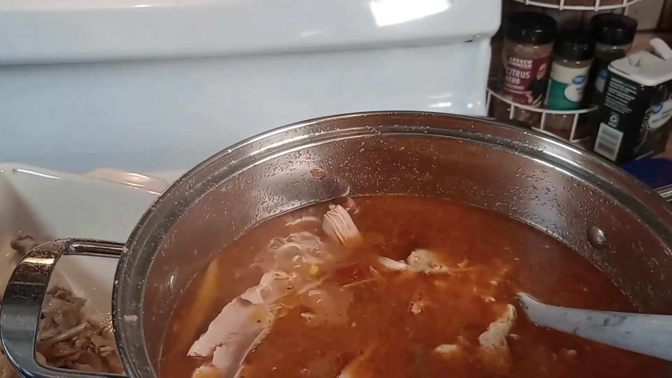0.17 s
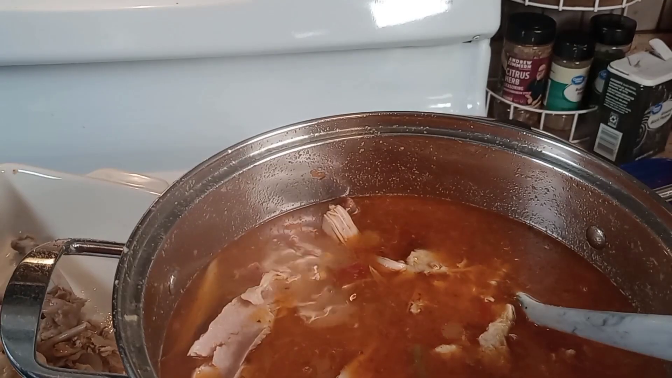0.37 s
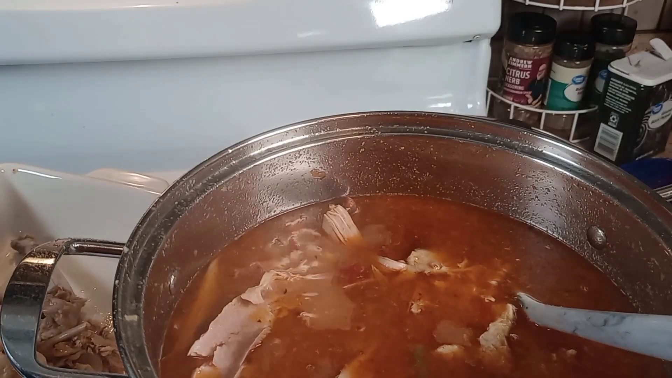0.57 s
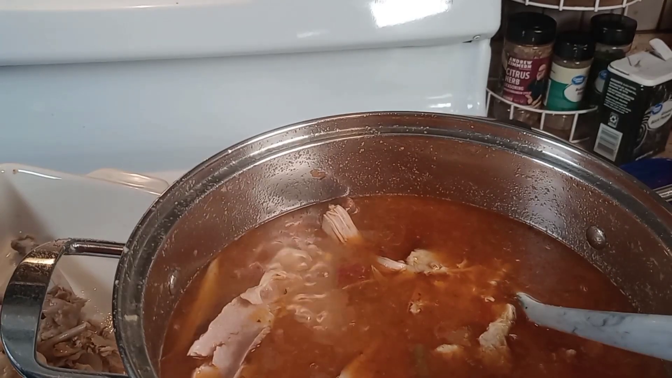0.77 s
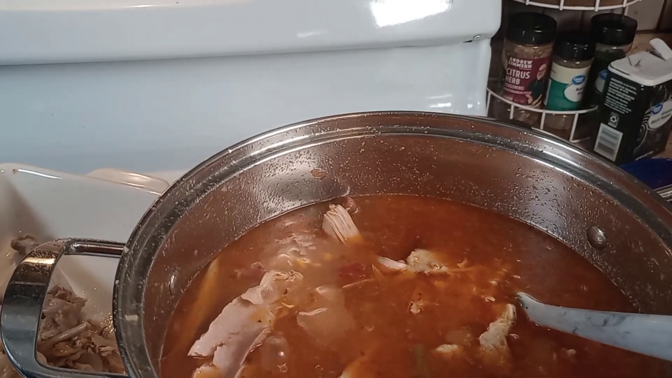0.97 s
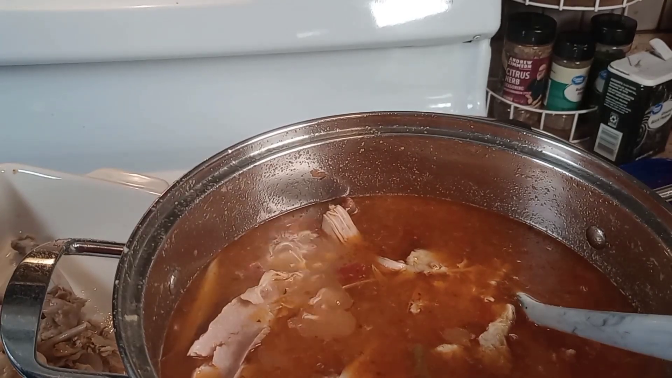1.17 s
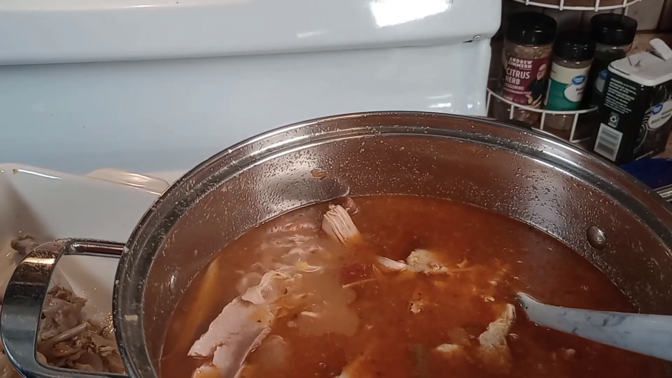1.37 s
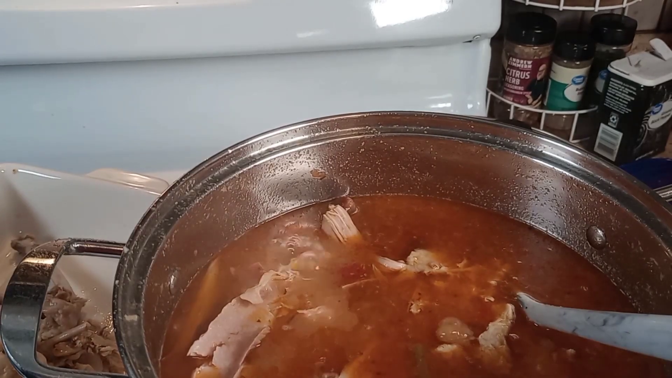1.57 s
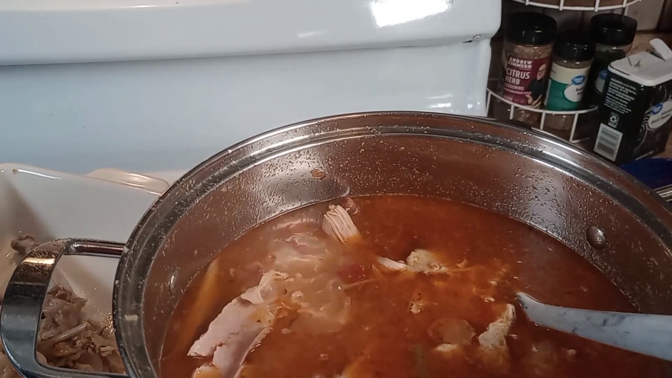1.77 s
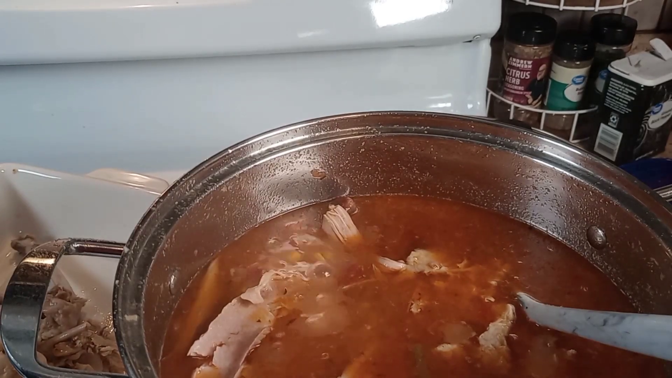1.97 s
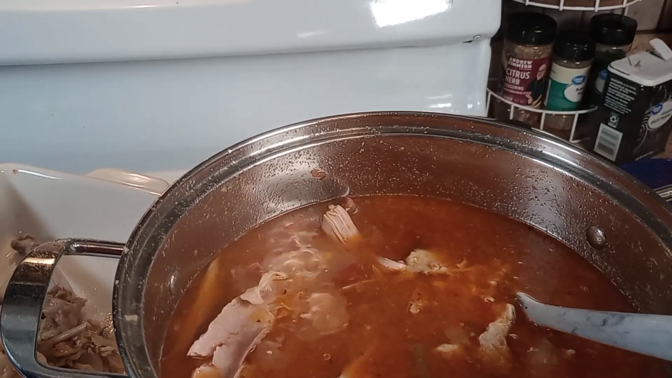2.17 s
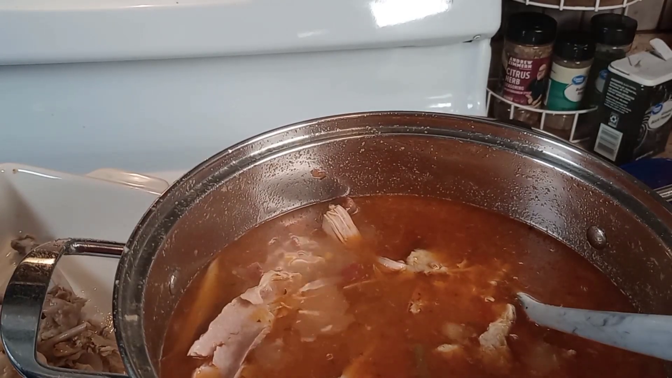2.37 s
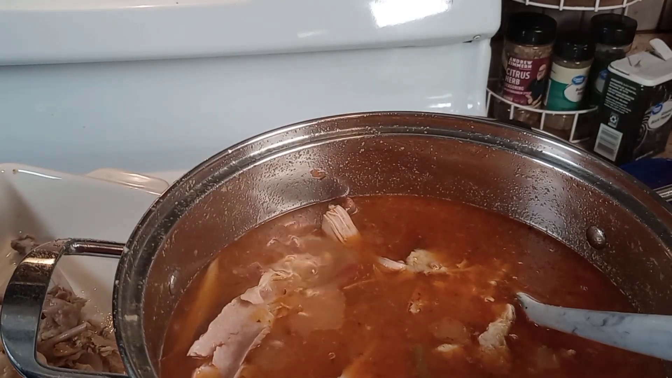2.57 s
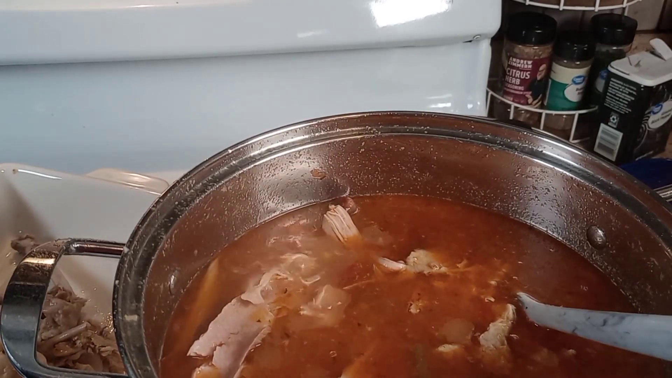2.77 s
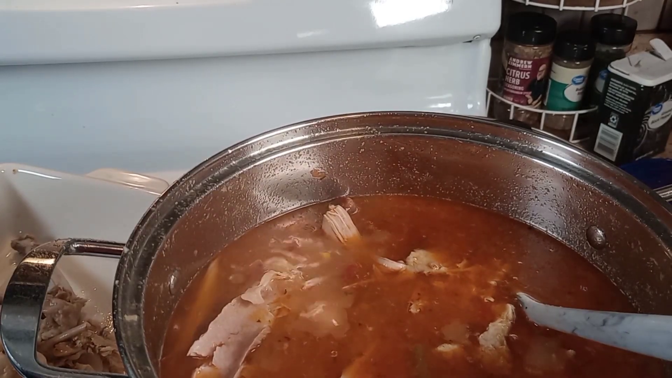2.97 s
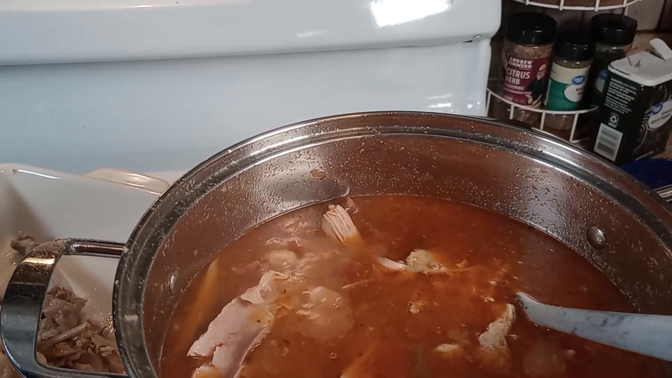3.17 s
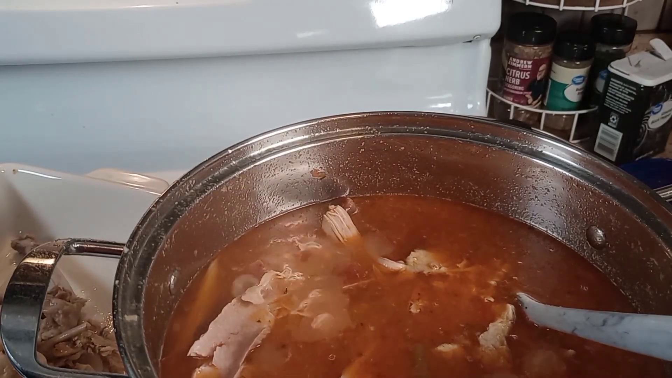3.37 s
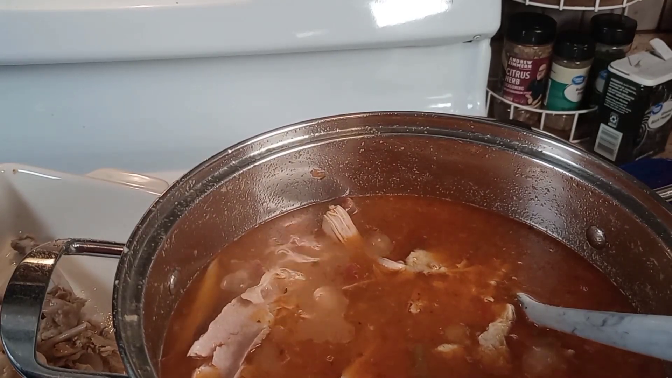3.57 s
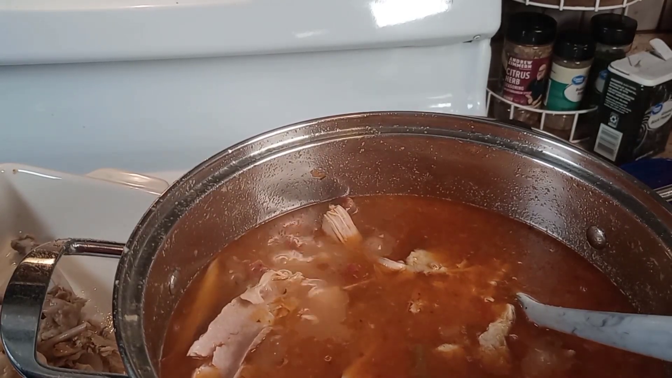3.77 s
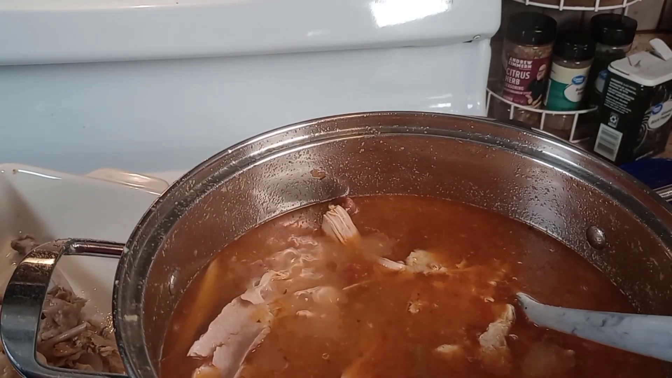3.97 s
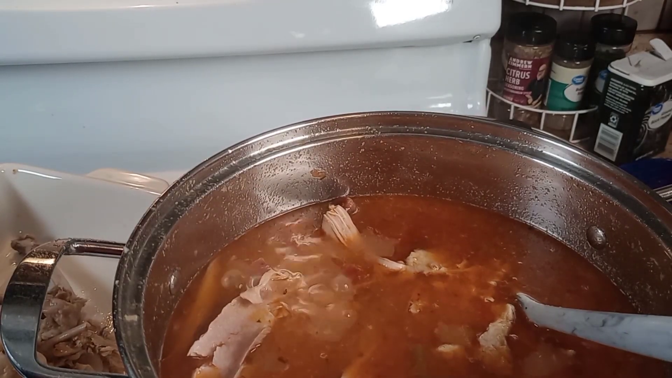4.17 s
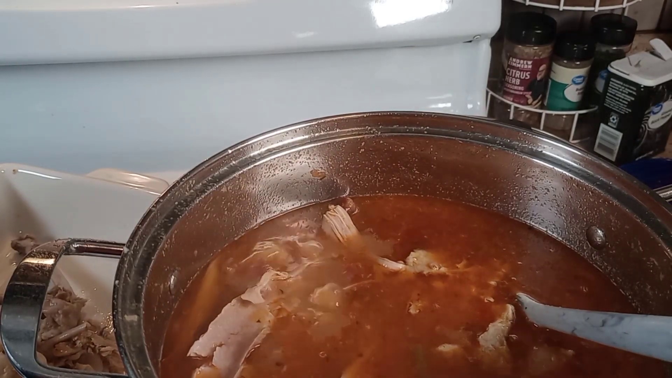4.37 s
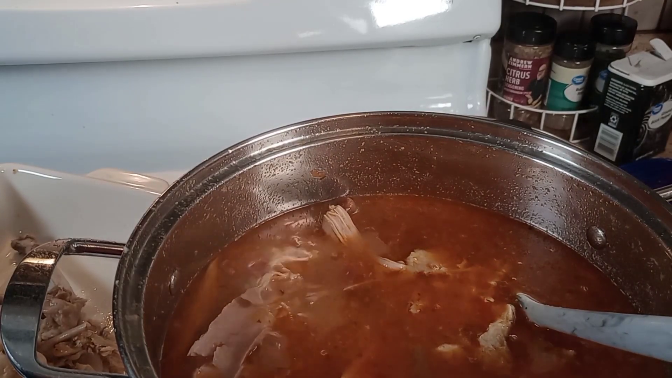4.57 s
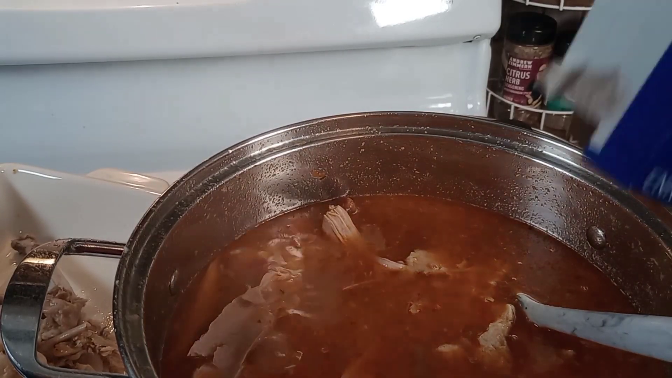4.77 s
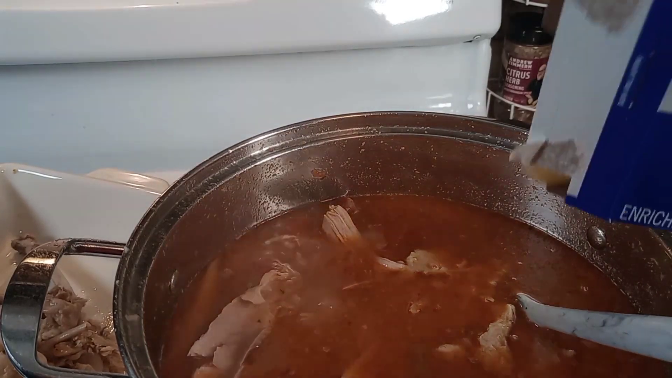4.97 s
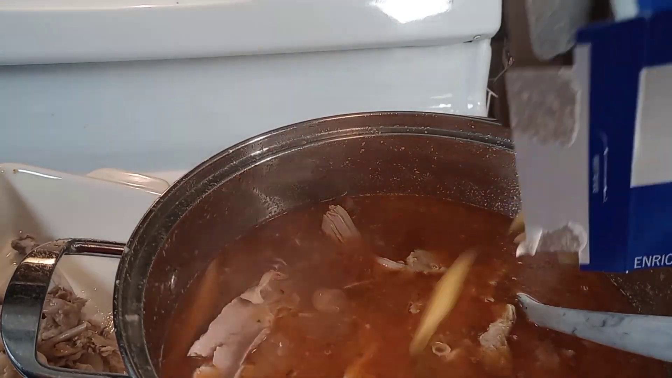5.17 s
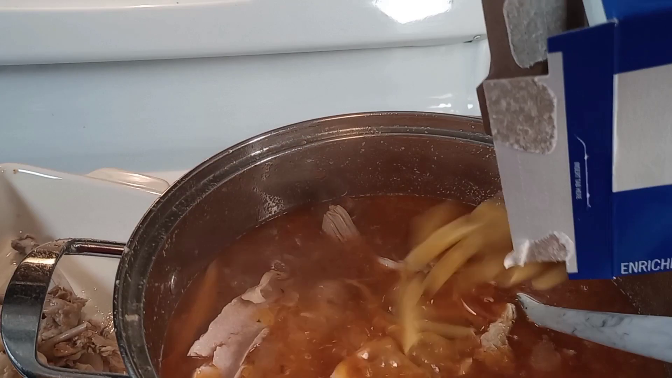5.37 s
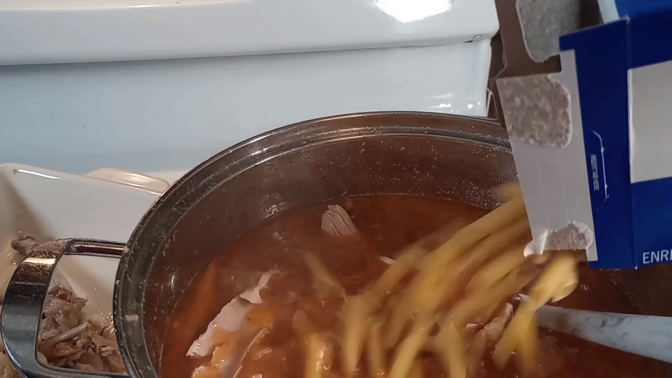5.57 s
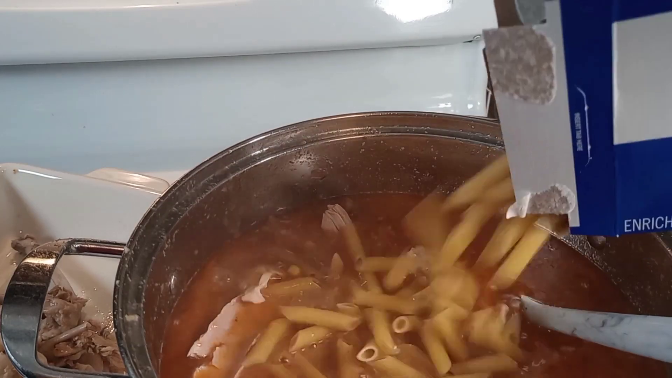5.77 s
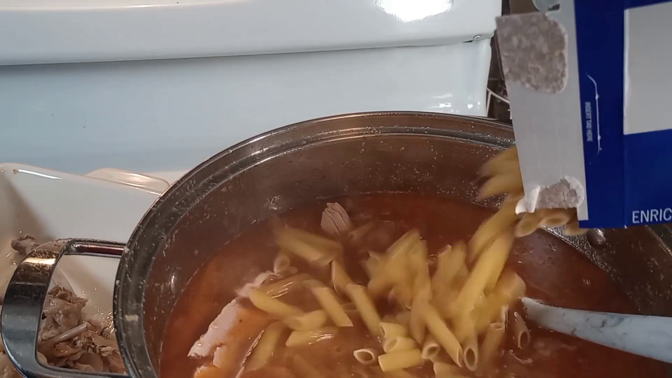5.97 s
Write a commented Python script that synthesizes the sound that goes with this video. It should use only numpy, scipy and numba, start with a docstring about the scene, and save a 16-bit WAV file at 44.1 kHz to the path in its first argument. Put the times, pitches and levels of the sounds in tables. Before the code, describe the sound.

Close stereo pickup in a small, dry kitchen with a faint fridge hum and soup fizz. A box of dry pasta slides and rattles, slightly left, for under a second. Fingers then knock, snap and scuff the cardboard flap with soft low thuds and small shifts inside. Finally the box tilts on the right and tubes slither and pour out, growing brighter until the end.

```python
"""A small kitchen, a phone with two microphones close by: a fridge hums and soup fizzes faintly in a pot.
Dry pasta tubes slide and rattle in a cardboard box on the left, fingers pry the flap with knocks and scuffs,
then the box tips on the right and the tubes pour into the pot. Hum and fizz are shaped noise, tubes are showers
of short ringing collisions over a noisy slither, knocks are noise bursts with a ring, thuds low damped sines."""
import sys
import numpy as np
from scipy import signal
from scipy.fft import rfft, irfft, next_fast_len
from scipy.io import wavfile
from scipy.ndimage import uniform_filter1d
from numba import njit

SR = 44100
rng = np.random.default_rng(int(sys.argv[2]) if len(sys.argv) > 2 else 0)


def wav_out(sig):
    """Save sig, one row per channel (or a flat mono array), as 16-bit PCM at SR to the path in sys.argv[1]."""
    wavfile.write(sys.argv[1], SR, np.round(np.clip(np.atleast_2d(sig).T, -1, 1) * 32767).astype(np.int16))


N = 266048


def amp(db):
    """Decibels to amplitude gain."""
    return 10 ** (np.asarray(db) / 20)


def unit(x):
    """Scale to rms 1."""
    return x / np.sqrt(np.mean(x ** 2) + 1e-20)


def along(points, hz):
    """Interpolate (Hz, value) points on a log frequency axis."""
    f, v = np.transpose(points)
    return np.interp(np.log(hz + 1), np.log(f + 1), v)


def band(hz, lo_hz, hi_hz):
    """Smooth band-pass gain."""
    return 1 / np.sqrt((1 + (lo_hz / (hz + 1)) ** 8) * (1 + (hz / hi_hz) ** 8))


def boost_db(modes, hz):
    """Sum of resonance humps given as (Hz, width Hz, boost dB)."""
    return sum(db / (1 + (2 * (hz - c) / w) ** 2) for c, w, db in modes)


def filtered(x, response):
    """Multiply the spectrum of x by a real or complex response of frequency."""
    m = next_fast_len(x.shape[-1] + SR // 8)
    spectrum = rfft(x, m) * response(np.fft.rfftfreq(m, 1 / SR))
    return irfft(spectrum, m)[..., :x.shape[-1]]


def causal(x, gain):
    """Filter x at minimum phase, so nothing sounds before a blow."""
    size = 4096
    cepstrum = irfft(np.log(gain(np.fft.rfftfreq(size, 1 / SR)) + 1e-6))
    # folding the cepstrum onto positive time gives minimum phase
    cepstrum[1:size // 2] *= 2
    cepstrum[size // 2 + 1:] = 0
    impulse = irfft(np.exp(rfft(cepstrum)))
    return signal.fftconvolve(x, impulse[None], axes=1)[:, :x.shape[1]]


def ringing(x, notes):
    """Pass x through resonances (Hz, width Hz, boost dB) that notes(t) lets move in time."""
    frames = dict(nperseg=1024, noverlap=896)
    hz, t, z = signal.stft(x, SR, **frames)
    f = hz[:, None]
    for c, w, db in notes(t):
        resonance = 1j * f * w / (c * c - f * f + 1j * f * w)
        z = z * (1 + (amp(db) - 1) * resonance)
    return signal.istft(z, SR, **frames)[1][:, :N]


# the quiet kitchen's fizz, as a spectrum: freq_hz, level_db (relative)
FIZZ_COLOUR = [(25, -28.5), (55, 0), (129, -8), (511, -2.5), (1200, -13.5), (1480, -5), (2700, -19.5),
               (15000, -37)]
FIZZ_DB, HUM_DB = -73, -82.0  # rms


def background():
    """Soup fizz is noise patchy in time and pitch; the fridge hum is noise narrowed round 128 Hz, so it wavers."""
    z = signal.stft(rng.standard_normal((2, N + 512)), nperseg=512)[2]
    patches = uniform_filter1d(rng.standard_normal(z.shape[1:]), 8, 0)
    patches = uniform_filter1d(patches, 10, 1)
    fizz = signal.istft(z * amp(1.4 * unit(patches)), nperseg=512)[1][:, :N]
    fizz = filtered(fizz, lambda hz: amp(along(FIZZ_COLOUR, hz)))
    hum = filtered(rng.standard_normal(N), lambda hz: np.exp(-((hz - 128) / 9) ** 2))
    return amp(FIZZ_DB) * unit(fizz) + amp(HUM_DB) * unit(hum)


# time the kitchen takes to die by 60 dB: freq_hz, t60_s
KITCHEN_T60 = [(150, 0.069), (1500, 0.093), (10000, 0.12)]


def kitchen(x):
    """Room tails of decaying noise, each frequency dying at its own speed, redrawn every sixth of a second."""
    hop = SR // 6
    out = np.zeros((2, x.shape[1] + SR))
    blend = np.sin(np.pi * np.arange(2 * hop) / (2 * hop))
    for a in range(0, x.shape[1], hop):
        hz, t, z = signal.stft(rng.standard_normal((2, SR // 5)), SR, nperseg=256)
        z[1] = np.where(hz[:, None] < 400, z[0], z[1])  # both microphones share the bass
        decay = amp(-60 * t / along(KITCHEN_T60, hz)[:, None])
        tail = signal.istft(z * decay, SR, nperseg=256)[1]
        piece = x[:, a:a + 2 * hop]
        if piece.any():
            wet = signal.fftconvolve(piece * blend[:piece.shape[1]], tail / np.linalg.norm(tail[0]), axes=1)
            out[:, a + 100:][:, :wet.shape[1]] += wet  # 100 samples after the direct sound
    return out[:, :x.shape[1]]


def placed(x, side, left_lag_ms, wet_db):
    """Add the room, then set level by frequency and arrival time between the phone's two microphones."""
    half = np.array([[.5], [-.5]])

    def port(hz):
        delay = np.exp(-2j * np.pi * hz * half * left_lag_ms / 1000)
        return amp(half * along(side, hz)) * delay

    return filtered(x + amp(wet_db) * kitchen(x), port)


# soft thuds through the counter: start_s, level_db (before the envelope), pitch_hz
COUNTER_THUDS = [(0.167, -43.5, 215), (0.952, -40.5, 337), (1.778, -30, 263), (2.403, -30.5, 225),
                 (2.453, -22.5, 211), (2.56, -40, 220), (2.839, -38.5, 104.5), (2.924, -46, 101),
                 (3.606, -50, 119), (3.814, -37, 151)]


def thuds():
    """Soft low pushes through the counter: damped sines with a rounded start, 3 dB stronger on the left."""
    out, t = np.zeros(N + SR), np.arange(SR // 8) / SR
    envelope = np.exp(-t / 0.013) * (1 - np.exp(-t / 0.0019))
    for s, db, hz in COUNTER_THUDS:
        out[round(s * SR):][:len(t)] += amp(db) * np.sin(2 * np.pi * hz * t) * envelope
    return out[:N] * amp([[1.5], [-1.5]])


# single knocks and snaps on cardboard: start_s, level_db, snap_db (over level_db), pitch_hz; levels relative
CARD_KNOCKS = [(0.326, -15, -13, 840), (0.516, -15, -28, 790), (0.746, -12.5, -22, 780),
               (0.95, -39, -36, 1350), (1.469, -48, -34, 1440), (1.554, -33, -22, 1555),
               (1.781, -43.5, 1.5, 1280), (1.804, -18.5, -33, 3664), (1.904, -25, -22.5, 1000),
               (2.058, -34.5, -33, 1350), (2.444, -30, -27, 1900), (2.454, -15.5, -35, 990),
               (2.49, -21.5, -15.5, 1620), (2.557, -23, -36, 1220), (2.956, -34, -35, 1530),
               (3.004, -25, -29, 1085), (3.022, -43.5, -1, 3700), (3.239, -45, -13.5, 1370),
               (3.545, -43.5, -16, 1680), (3.569, -52.5, -8, 4300), (3.8076, -17.5, -5.5, 3030),
               (3.823, -15, -10, 1350), (4.145, -26.5, -62, 916), (4.306, -33, -2.5, 2840),
               (4.351, -34, -1.5, 4260), (4.367, -56.5, 9, 4000), (4.483, -25.5, -24, 870),
               (4.782, -18, -34, 878), (4.845, -16, -21, 973), (5.244, -24, -20, 853),
               (5.315, -16.5, -14, 867), (5.356, -18, -27, 3090), (5.548, -24.5, -1.5, 920),
               (5.563, -13.5, -5, 2840), (5.62, -22.5, -1.5, 1050), (5.72, -20.5, 5, 3000),
               (5.733, -22.5, 3, 5800), (5.802, -21.5, 1, 1010), (5.818, -25, 4, 8240),
               (5.856, -20, -6.5, 1015), (5.949, -13, -11, 3110)]


def knocks(start, end, colour, low_db, die_ms, snap_ms, ring_ms_at_1khz):
    """Each knock is a fast-dying burst in three registers of the box's colour, with one short pitched ring."""
    t = np.arange(SR // 20) / SR
    first, n = round(start * SR), round((end - start) * SR)
    drive, ring = np.zeros((3, n + SR // 4)), np.zeros(n + SR // 4)
    decay = np.exp(-1000 * t / np.array([[die_ms], [die_ms], [snap_ms]]))
    for s, db, snap_db, hz in CARD_KNOCKS:
        if start <= s < end:
            at = round(s * SR) - first
            burst = rng.standard_normal(len(t)) * decay
            drive[:, at:at + len(t)] += amp([[db + low_db], [db - 7.0], [db + snap_db + 4.5]]) * burst
            ring_decay = np.exp(-t * np.sqrt(1000 * hz) / ring_ms_at_1khz)  # high rings die sooner
            ring[at:at + len(t)] += amp(db - 7.5) * np.sin(2 * np.pi * hz * t) * ring_decay
    out = causal(ring[None], lambda hz: band(hz, 400, 17000))[0]
    for row, (lo, hi) in zip(drive, [(160, 700), (800, 4500), (4500, 17000)]):
        gain = lambda hz: colour(hz) * band(hz, lo, hi)
        out += causal(row[None], gain)[0] / np.sqrt(np.mean(gain(np.fft.rfftfreq(4096, 1 / SR)) ** 2))
    return np.pad(out, (first, N))[:N]


@njit
def pings(n, start, step, fade, size):
    """Damped sines: start sample, radians a sample, decay a sample, size."""
    out = np.zeros(n)
    for k in range(len(start)):
        if size[k] == 0:
            continue
        turn = np.exp(1j * step[k] - fade[k])
        z = size[k] + 0j
        for i in range(start[k], min(n, start[k] + int(5 / fade[k]))):
            out[i] += z.imag
            z *= turn
    return out


CONTACT_DB = -4  # dry click of the contacts against the ring of the tubes


def collisions(n, per_s, spread_db, cycles, scatter_ms):
    """Tube meets tube: each blow clicks and rings eight short notes, low to high, from its own spot in the heap."""
    count = int(900 * n / SR)  # candidate blows, thinned to per_s
    when, size, keep, spot = rng.random((count, 4)).T
    size = (keep < per_s / 900) * amp(-spread_db * np.log(size + .04))  # few hard blows, many soft
    click = []
    for side in (1, -1):
        at = when * n + side * (spot - .5) * scatter_ms * SR / 2000
        click.append(np.bincount(np.clip(at, 0, n - 1).astype(int), size, n))
    hz = 130 * 2 ** (.87 * (np.arange(8) + rng.random((count, 8))))
    # cycles a note rings before falling to 1/e
    life = cycles * np.exp(.35 * rng.standard_normal((count, 8))) * (hz / 1000) ** .3
    # note levels vary, and slightly so between the microphones
    vary_db = 4.4 * rng.standard_normal((count, 8)) + 0.5 * rng.standard_normal((2, count, 8))
    size = size[:, None] * hz / np.sqrt(life) * amp(vary_db)
    shift = (spot[:, None] - .5 + .3 * rng.standard_normal((count, 8))) * scatter_ms * SR / 1000
    step, fade = (2 * np.pi * hz / SR).ravel(), (hz / life / SR).ravel()
    ring = []
    for side, port_size in zip((1, -1), size):
        at = np.clip(when[:, None] * n + side * shift / 2, 0, n).astype(np.int64)
        ring.append(pings(n, at.ravel(), step, fade, port_size.ravel()))
    return unit(unit(np.array(ring)) + amp(CONTACT_DB) * unit(np.array(click)))


def rattle(motion, colour, per_s, spread_db, cycles, slither_db, scatter_ms):
    """The same collisions, over a dense slither, drive the walls, the clatter and the bright ticks."""
    s, wall_db, clatter_db, tick_db = np.transpose(motion)
    first, last = round(s[0] * SR), min(N, round(s[-1] * SR))
    n = last - first
    # no fade-out where the motion reaches the end of the sound
    to_end = np.arange(n)[::-1] + SR * (last == N)
    fade = np.minimum(1, np.minimum(np.arange(n), to_end) / 600)
    level = lambda db: fade * amp(np.interp(np.arange(first, last) / SR, s, db))
    noise = rng.standard_normal((3, n))
    # one shared noise, plus one for each microphone in the middle register
    slither = unit(noise[0] + 2.2 * filtered(noise[1:], lambda hz: band(hz, 870, 6000)))
    drive = collisions(n, per_s, spread_db, cycles, scatter_ms) + amp(slither_db) * slither
    part = lambda lo, hi: unit(causal(drive, lambda hz: colour(hz) * band(hz, lo, hi)))
    heap = level(wall_db) * part(40, 1412)
    heap = heap + level(wall_db + clatter_db) * part(1415, 3720)
    heap = heap + level(wall_db + tick_db) * part(5720, 25000)
    return np.pad(heap, ((0, 0), (first, N - last)))


# short slides and scuffs of the heap as the box is handled, tipped and emptied: start_s, length_s, wall_db,
# swell_db (over the slide), clatter_db, tick_db (both over the wall rumble)
HEAP_SLIDES = [(1.53, 0.028, -72.5, 21, -22, 9), (1.586, 0.32, -90.5, 16, -17, 17),
               (1.779, 0.068, -40.5, -4.5, -0.5, -2.5), (1.89, 0.091, -48, -13, 10.5, 1.5),
               (2.135, 0.069, -81, 7, 17, 7), (2.401, 0.019, -45, 3.5, -6, -23.5),
               (2.452, 0.032, -32.5, -4.5, -0.5, -18), (2.52, 0.035, -49.5, 10.5, -2.5, -21.5),
               (2.592, 0.037, -52.5, 2, 4, -20), (2.741, 0.26, -65, -13, 4, -10.5),
               (2.87, 0.044, -71, 11, 7, -6), (2.952, 0.067, -54.5, 1.5, 3.5, -16),
               (3.343, 0.043, -58, -1.5, 7, -14), (3.442, 0.028, -68, 0.5, 0, -9.5),
               (3.59, 0.06, -68.5, -12, 5, -11), (3.804, 0.068, -39.5, -20, 8.5, 2),
               (4.107, 0.045, -68.5, 16, 12.5, -4.5), (4.168, 0.097, -59.5, 2.5, 12.5, -5),
               (4.484, 0.008, -42, -11, 11.5, -23), (4.827, 0.021, -41, 12.5, -0.5, -10.5),
               (5.98, 0.059, -40, 0.5, -1, 8.5)]
# how fast walls, clatter and ticks die down after a slide: fall_db_per_s
SETTLE = [519, 466, 465]
# onset speed of a slide at SOFT_DB or below; above it the speed grows by JOLT dB per dB
START_DB_PER_S, SOFT_DB, JOLT = 2400, -60, 0.45


def nudged(motion):
    """Add the short slides, as powers, to the slow motion of the box, in rows one millisecond apart."""
    s, wall_db, clatter_db, tick_db = np.transpose(motion)
    t = np.arange(s[0], s[-1], 1 / 1000)
    power = np.array([amp(2 * np.interp(t, s, wall_db + over)) for over in (0, clatter_db, tick_db)])
    for start, length, db, swell_db, *over in HEAP_SLIDES:
        if s[0] <= start < s[-1]:
            swell = swell_db * np.clip((t - start) / length, 0, 1)
            onset_speed = START_DB_PER_S * amp(JOLT * max(db - SOFT_DB, 0))
            shape = db + swell - onset_speed * np.maximum(start - t, 0)
            settle = np.outer(SETTLE, np.maximum(t - start - length, 0))
            power = power + amp(2 * (shape + np.array([0, *over])[:, None] - settle))
    wall, clatter, tick = 10 * np.log10(power)
    return np.transpose([t, wall, clatter - wall, tick - wall])


# notes a bent card panel lends the heap for a moment, and (the negative row) a brief dip near 600 Hz at 5.1 s:
# # start_s, end_s, pitch_hz, boost_db
PANEL_NOTES = [(1.896, 2.007, 972, 19), (1.916, 1.962, 378, 20), (2.645, 2.68, 800, 19),
               (2.736, 2.813, 900, 10), (2.978, 3.032, 1000, 13), (3.354, 3.418, 750, 25),
               (4.092, 4.235, 515, 20), (5.104, 5.214, 603, -25)]
# sharpness at no boost (stronger boosts are set narrower); time a note takes to come and go
PANEL_Q, BEND_S = 3.6, 0.012


def panels(t):
    """Each note is a resonance whose boost or dip fades in and out over BEND_S."""
    notes = []
    for a, b, hz, db in PANEL_NOTES:
        bend = np.clip(np.minimum(t - a, b - t) / BEND_S + .5, 0, 1)
        width_hz = hz / PANEL_Q / amp(max(db, 0) / 2)
        notes.append((hz, width_hz, db * bend))
    return notes


# closed box in motion: time_s, wall_db, clatter_db, tick_db (the last two over the wall rumble)
SHAKE_MOTION = [(0.14, -69, 8.5, -19), (0.2, -47.5, -6, -20.5), (0.3, -29, -4.5, -18),
                (0.55, -27.5, -4, -16), (0.72, -25, -8, -20.5), (0.77, -19, -12, -22),
                (0.815, -28, -2.5, -17.5), (0.92, -52, -0.5, -16.5), (1.0, -95, -32, -13)]
# colour of the closed box: freq_hz, level_db (relative)
CLOSED_COLOUR = [(35, -57), (133, -34), (211, -12), (322, -4.5), (604, 3), (1010, -1), (1220, -5),
                 (2750, -7.5), (5280, -25), (15800, -58)]
# closed box between the microphones: freq_hz, left_minus_right_db
CLOSED_SIDE = [(60, 7), (240, 2.5), (3770, 1.5), (15000, -7)]


def shake():
    """Tubes slide and rattle in the closed box, short and dull, with knocks against its walls."""
    closed = lambda hz: amp(along(CLOSED_COLOUR, hz))
    box = rattle(SHAKE_MOTION, closed, 700, 4.8, 1.1, -4, .4)
    box = box + knocks(0, 1.2, closed, -11.5, 6.7, 2.9, 2.6)
    return placed(box, CLOSED_SIDE, -0.37, -3.3)


# box at rest in the hands: time_s, wall_db, clatter_db, tick_db (the last two over the wall rumble)
HELD_MOTION = [(0.975, -64, 1.5, -22), (1.3, -70, -2, -15.5), (2.3, -73, 6, -6), (3.3, -72, -2.5, -17),
               (3.71, -76, 0.5, -9.5), (4.105, -78, 12.5, -11.5)]
# colour of the held box: freq_hz, level_db (relative)
HELD_COLOUR = [(35, -24), (142, -5.5), (216, -2), (329, 1), (694, -1), (1330, -5.5), (2560, -14.5),
               (3550, -18), (15800, -54.5)]
# card panels under the fingers: pitch_hz, width_hz, boost_db
FLAP_NOTES = [(810, 63, 6.5), (1350, 160, 2.5)]
# held box between the microphones: freq_hz, left_minus_right_db
HELD_SIDE = [(60, 23.5), (240, -0.5), (950, 5), (3770, 3), (15000, -8)]
# the held box wanders: time_s, extra_left_minus_right_db
HELD_SWAY = [(1.0, -4.5), (2.351, 2), (2.8, 5), (3.3, 1), (3.8, 3), (3.95, -17.5)]


def pry():
    """Fingers knock and scuff the flap while the heap slides briefly and bent panels colour it."""
    held = lambda hz: amp(along(HELD_COLOUR, hz) + boost_db(FLAP_NOTES, hz))
    heap = rattle(nudged(HELD_MOTION), held, 500, 6.7, 4.1, -6.0, 0.53)
    box = ringing(heap, panels) + knocks(1.2, 4.05, held, -24, 2.54, 0.89, 7.4)
    sway_db = np.interp(np.arange(N) / SR, *np.transpose(HELD_SWAY))
    return amp(np.array([[.5], [-.5]]) * sway_db) * placed(box, HELD_SIDE, -0.295, -3.0)


# air note of the open box as its heap shifts: time_s, pitch_hz, width_hz, boost_db
MOUTH_NOTE = [(4.1, 974, 34.8, 17), (4.46, 946, 35, 20.5), (4.5, 910, 150, 11), (4.65, 646, 150, 13),
              (4.8, 800, 100, 11), (4.95, 950, 120, 9), (5.5, 1027, 113, 15)]


def air_note(x):
    """A resonance slides as the air space in the box changes, together with the panel notes."""
    s, *note = np.transpose(MOUTH_NOTE)
    return ringing(x, lambda t: [[np.interp(t, s, column) for column in note]] + panels(t))


# open box tilting: time_s, wall_db, clatter_db, tick_db (the last two over the wall rumble)
TIP_MOTION = [(4.07, -68, 9, -17), (4.47, -66.5, 6, -0.5), (4.52, -47.5, 0.5, -14.5), (4.62, -45.5, 3, -10),
              (4.8, -35.5, -1, -13.5), (4.93, -43, 0.5, -12.5), (5.1, -38, 1, -8), (5.2, -46.5, 4, -30)]
# tubes pouring out: time_s, wall_db, clatter_db, tick_db (the last two over the wall rumble)
POUR_MOTION = [(5.12, -45, -1.5, -10.5), (5.3, -34, 0.5, -15), (5.57, -32, 1, -7), (5.66, -33, 3, 1),
               (5.84, -36, 4, -2), (6.07, -41.5, 7.5, 6.5)]
# colour of the tilting box: freq_hz, level_db (relative)
TIPPED_COLOUR = [(35, -72), (60, -31), (206, -13.5), (563, -10.5), (962, -6), (1220, -8.5), (1570, -1),
                 (2330, -6), (5160, -19.5), (15800, -62)]
# colour of the emptying box: freq_hz, level_db (relative)
EMPTYING_COLOUR = [(35, -47), (136, -14), (632, -5.5), (1010, -11), (1370, -9.5), (1760, -2.5),
                   (6220, -3.5), (11900, -16.5), (15800, -25)]
# steady note of the tipped box: pitch_hz, width_hz, boost_db
HOLLOW_NOTE = [(1630, 370, 2)]
# tipped box between the microphones: freq_hz, left_minus_right_db
TIPPED_SIDE = [(60, -4.5), (240, -5.5), (3770, -7.5), (15000, -17)]


def pour():
    """The open box tilts and empties on the right: longer rings through its air note, and bright knocks."""
    tipped = lambda hz: amp(along(TIPPED_COLOUR, hz) + boost_db(HOLLOW_NOTE, hz))
    emptying = lambda hz: amp(along(EMPTYING_COLOUR, hz) + boost_db(HOLLOW_NOTE, hz))
    tilting = rattle(nudged(TIP_MOTION), tipped, 700, 5.36, 6.1, -2.5, 0.3)
    pouring = rattle(nudged(POUR_MOTION), emptying, 750, 4.3, 6.1, -2, 0.4)
    box = air_note(tilting + pouring)
    box = box + knocks(4.05, 5, tipped, -39, 2.8, 1.0, 8.8)
    box = box + knocks(5, 6.02, emptying, -48, 0.86, 0.484, 10.0)
    return placed(box, TIPPED_SIDE, 0.24, -9.0)


def scene():
    """Three poses of the box, and thuds through the counter, over the quiet kitchen."""
    return background() + thuds() + shake() + pry() + pour()


TOP_HZ = 15850


def record(dry):
    """The phone keeps nothing above its band limit."""
    return filtered(dry, lambda hz: hz < TOP_HZ)


dry = scene()
out = record(dry)
wav_out(out)
```